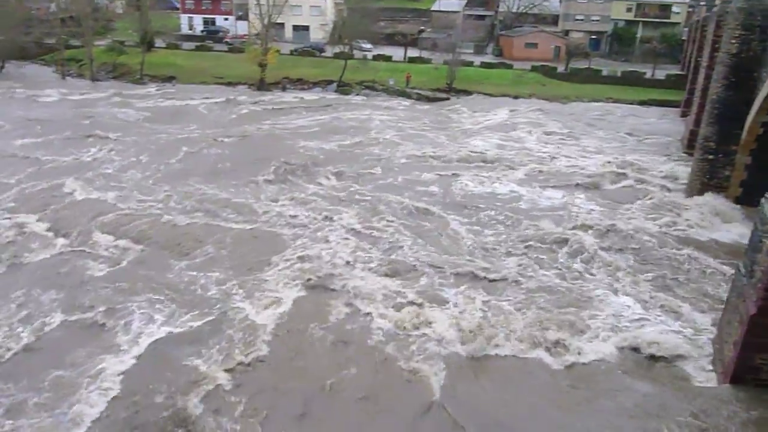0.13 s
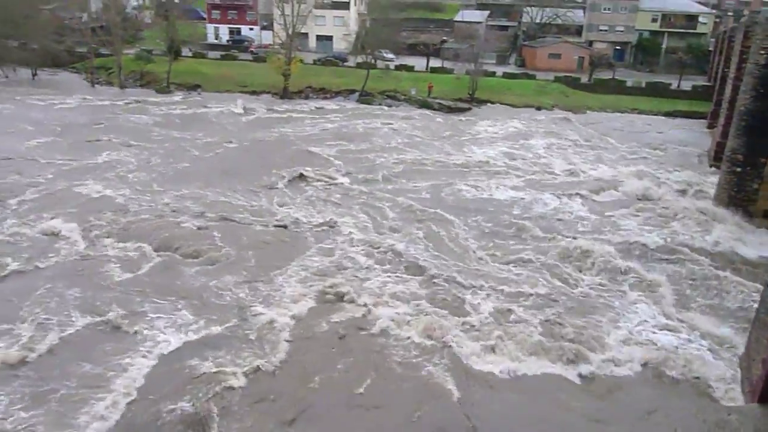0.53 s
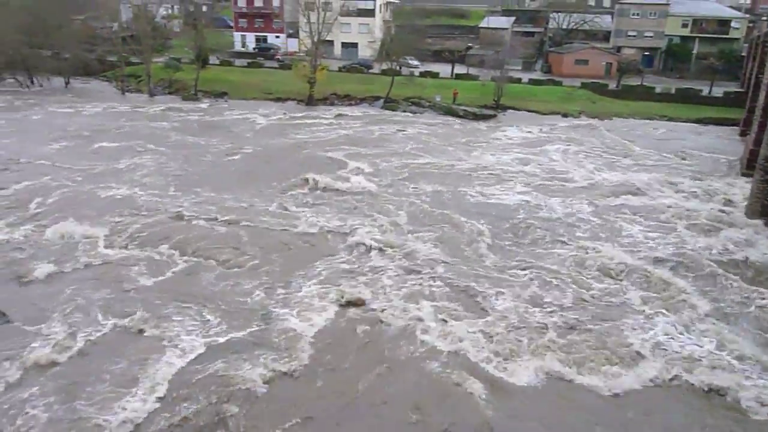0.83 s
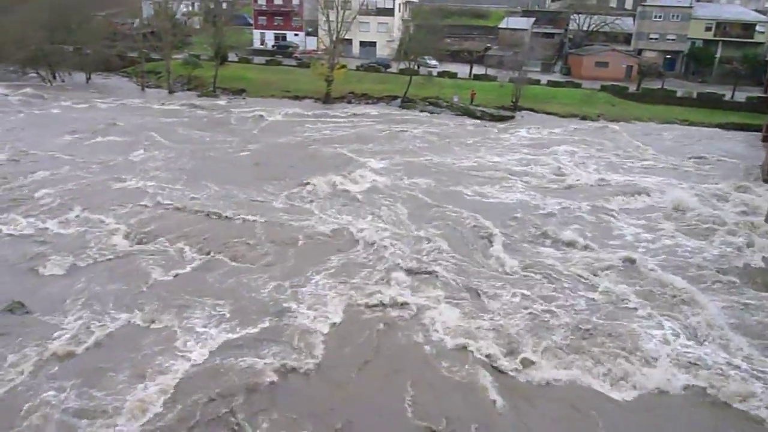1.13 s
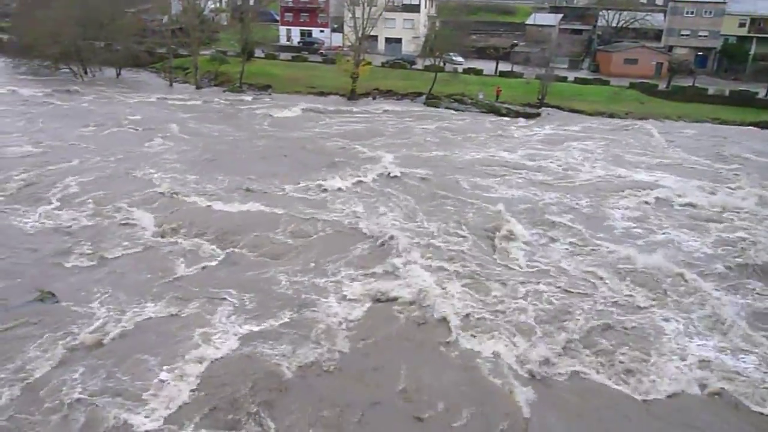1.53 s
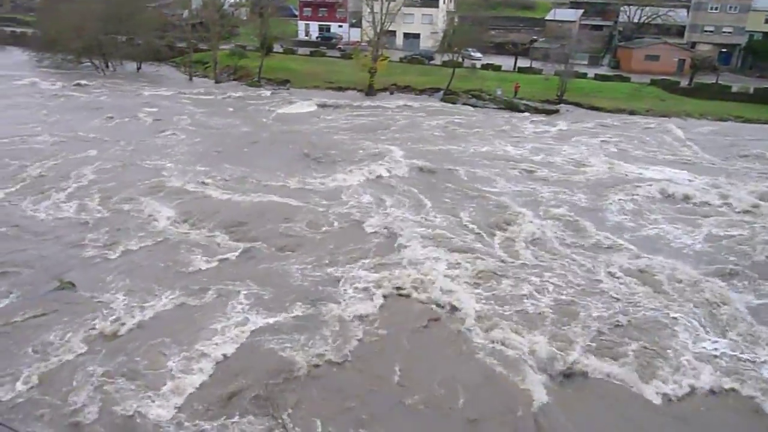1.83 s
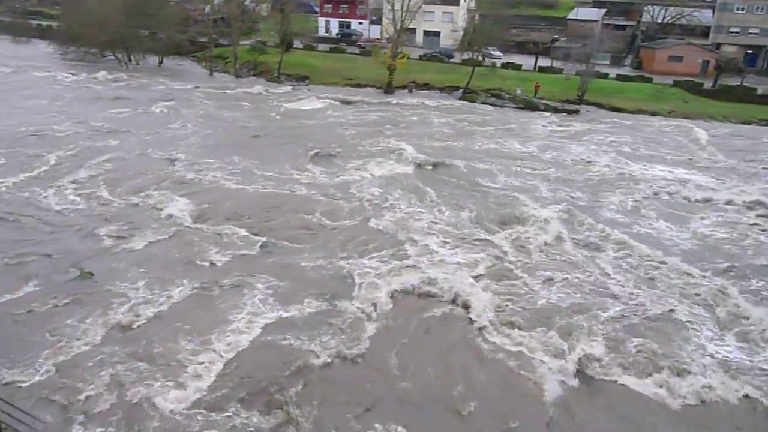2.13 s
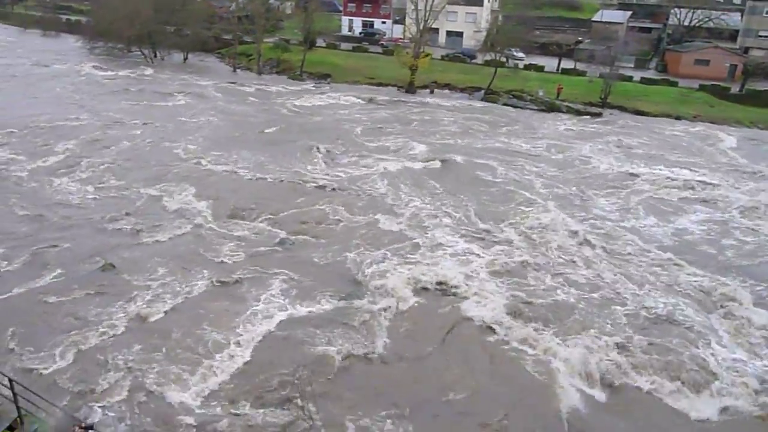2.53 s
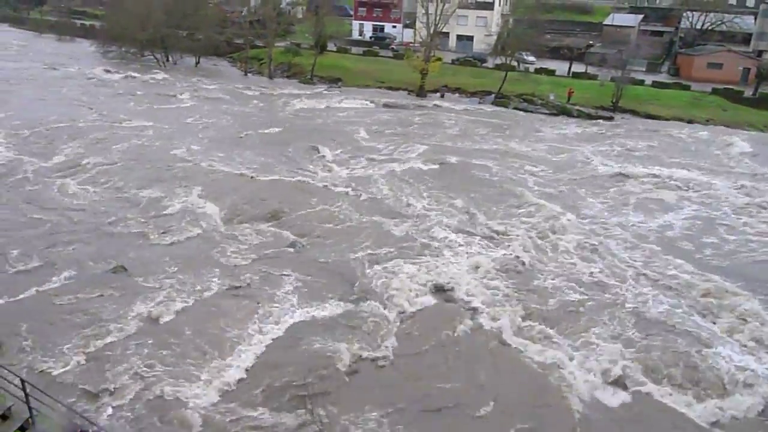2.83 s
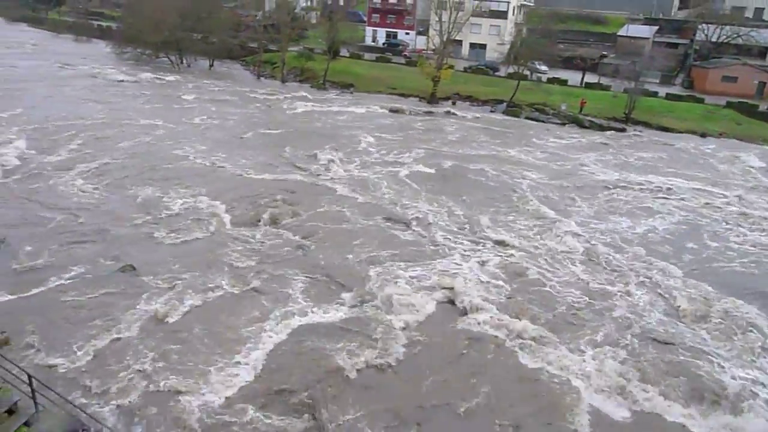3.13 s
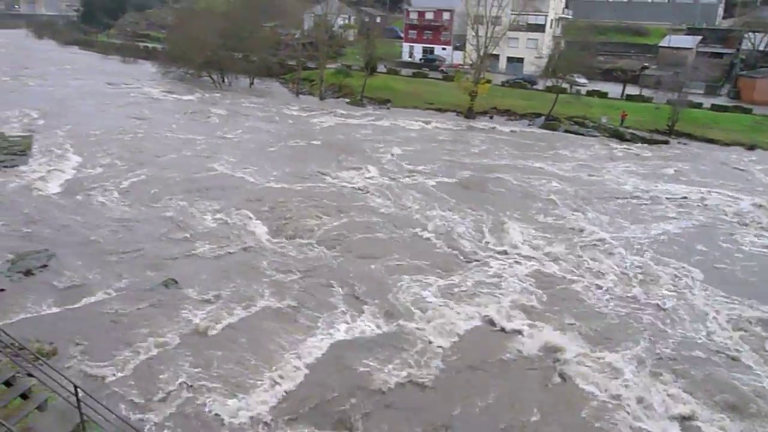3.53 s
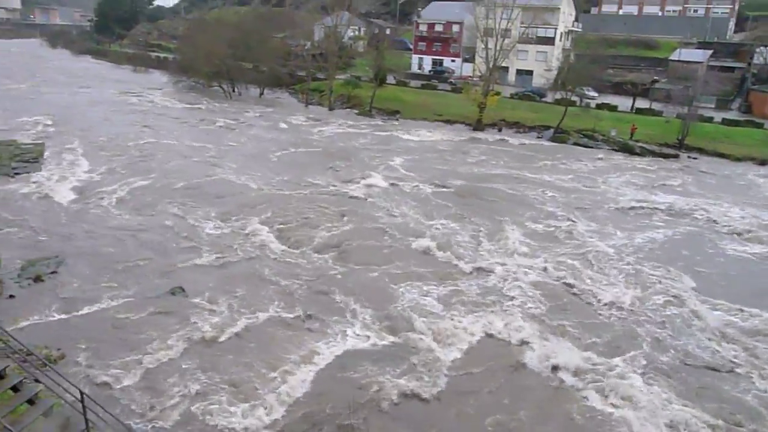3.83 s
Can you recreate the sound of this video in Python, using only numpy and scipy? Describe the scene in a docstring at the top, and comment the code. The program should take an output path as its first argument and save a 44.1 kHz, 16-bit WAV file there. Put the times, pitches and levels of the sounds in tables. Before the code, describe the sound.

Gusts of wind hit the microphone with low rumbles and sharp thumps, scattered at first, then stronger and nearly continuous toward the end. A swollen river below the bridge keeps up a softer, even rush throughout.

```python
"""Wind buffets a small mono microphone: short separate gusts, then a blow that builds to the end.
Eddies on the microphone's port make the roar; the stronger the wind, the finer they get and the
brighter and more ragged it sounds. Hard eddies slap, small ones sputter, large slow ones rumble.
Behind it a river in flood, heard from a bridge above, rushes steadily with countless bubbles."""
import sys
import numpy as np
from scipy.fft import rfft, irfft, next_fast_len
from scipy.io import wavfile
from scipy.ndimage import map_coordinates

SR = 44100
rng = np.random.default_rng(int(sys.argv[2]) if len(sys.argv) > 2 else 0)


def wav_record(signal):
    """Record a signal, one row per channel, as 16-bit PCM in the file named by sys.argv[1]."""
    frames = np.transpose(np.atleast_2d(signal))
    bounded = np.clip(frames, -1, 1)
    # unit amplitude maps onto the largest positive 16-bit level
    quanta = np.round(bounded * 32767).astype(np.int16)
    wavfile.write(sys.argv[1], SR, quanta)


N = 176400

# Tone of the river's rush. Each row: frequency in Hz, relative level in dB.
RIVER_SPECTRUM = [(25, -29.5), (60, -8.5), (140, 0), (320, 1), (450, -4.5), (580, -1.5), (880, -2.5),
                  (1250, -6.5), (2000, -8.5), (3000, -9.5), (4500, -12.5), (6000, -16.5), (7000, -21.5)]
# The river's midrange swells most; bass and hiss stay nearly steady.
# Each row: frequency in Hz, depth in dB.
RIVER_PATCH_DEPTH = [(150, 0), (700, 1), (2000, 0.76), (5000, -0.24)]
# Tone of the largest eddies. Each row: frequency in Hz, relative level in dB.
RUMBLE_SPECTRUM = [(20, -18.5), (40, -22), (80, -3), (115, -3), (160, -3), (240, -21.5), (500, -56.5)]
# The bass swells and lulls on its own, phrase by phrase. Each point: time in seconds, level in dB.
RUMBLE_SWELLS = [
    [(0.0, -44), (0.076, -60), (0.13, -48), (0.378, -61), (0.44, -59), (0.462, -72), (0.508, -74),
     (0.52, -64)],
    [(0.53, -66), (0.564, -41), (0.956, -56), (1.01, -77), (1.064, -44), (1.262, -54), (1.28, -77),
     (1.35, -74)],
    [(1.36, -74), (1.424, -67), (1.65, -43), (1.674, -49.5), (1.908, -46.5), (1.954, -68), (2.012, -52),
     (2.2, -54)],
    [(2.21, -47.5), (2.358, -42.5), (2.702, -49.5), (2.966, -36.5), (3.072, -44.5), (3.65, -33.5),
     (3.67, -40), (4.0, -32.5)],
]
# Single hard eddies. Each row: centre time in seconds, pulse level in dB, tearing level in dB.
SLAP_HITS = [(0.008, -20, -60), (0.11, -17, -27), (0.13, -18, -17), (0.147, -7, -20.5), (0.175, -31, -23.5),
             (0.235, -28, -40), (0.55, -16, -32.5), (0.561, -33, -29), (0.576, -9.5, -44),
             (0.609, -10.5, -24), (0.672, -22, -31), (0.726, -26, -31.5), (1.067, -38, -41),
             (1.642, -29, -29.5), (1.664, -40, -30), (1.904, -20.5, -44), (2.319, -37, -53),
             (2.414, -17, -52), (2.467, -32, -27), (2.552, -17.5, -57), (2.593, -26, -35),
             (2.626, -14, -33.5), (2.684, -15.5, -30.5), (2.712, -9.5, -31), (2.841, -27, -31),
             (2.922, -21, -27.5), (3.019, -14, -47), (3.148, -13, -50), (3.186, -25, -53), (3.24, -14, -33),
             (3.273, -11, -25), (3.432, -8, -27), (3.48, -31, -27), (3.521, -20.5, -20.5),
             (3.584, -6.5, -22), (3.601, -4, -30), (3.649, -14, -25.5), (3.684, -13, -25.5),
             (3.731, -10, -26.5), (3.747, -20, -21.5), (3.761, -5, -22), (3.827, -17, -17),
             (3.842, -14, -25), (3.866, -15, -17), (3.879, -21, -18), (3.921, -9, -17), (3.979, 0, -42)]
# Tone of the fine turbulence around a slap. Each row: frequency in Hz, relative level in dB.
TEAR_SPECTRUM = [(100, -30.5), (450, -3), (900, 5.5), (1600, -1), (2800, -7.5), (4500, -19.5),
                 (7000, -33.5)]
# Tone of the wind's roar. Each row: frequency in Hz, relative level in dB.
ROAR_SPECTRUM = [(20, -25), (45, -10), (90, -7), (160, -0.5), (250, 3.44), (330, 1.5), (400, -0.5),
                 (480, -1.5), (620, -4), (1100, -15), (1550, -17.5), (2000, -21.5), (3000, -27),
                 (5000, -34), (7000, -44)]
# Flutter of the roar; fine eddies are the most fitful. Each row: frequency in Hz, depth in dB.
FLUTTER_DEPTH = [(100, .8), (400, 0.8), (1200, 1), (4000, 5)]
# Wind strength on the microphone, gust by gust. Each point: time in seconds, level in dB.
GUST_LEVELS = [
    [(0.0, -38), (0.01, -31), (0.026, -36.5), (0.04, -34.5), (0.05, -47), (0.068, -32), (0.08, -38.5),
     (0.144, -26), (0.21, -31.5)],
    [(0.22, -37), (0.232, -39), (0.258, -31.5), (0.276, -38), (0.302, -38.5), (0.338, -52), (0.36, -44)],
    [(0.51, -56), (0.522, -63), (0.548, -30), (0.612, -28.5), (0.632, -35.5), (0.658, -41), (0.674, -32),
     (0.744, -36), (0.76, -67), (0.776, -39.5), (0.79, -61)],
    [(0.82, -55), (0.854, -49), (0.862, -67), (0.896, -43), (0.904, -61), (1.052, -58), (1.07, -40),
     (1.178, -52), (1.276, -44.5), (1.292, -75), (1.45, -56)],
    [(1.5, -58), (1.512, -58), (1.536, -67), (1.546, -46), (1.566, -43), (1.588, -60), (1.644, -33),
     (1.678, -34), (1.688, -40), (1.782, -47), (1.8, -64)],
    [(1.82, -50), (1.832, -53), (1.862, -43), (1.868, -46), (1.9, -46), (1.908, -34.5), (1.924, -44),
     (1.934, -64), (2.124, -45), (2.192, -55), (2.2, -45.5)],
    [(2.22, -37), (2.23, -37), (2.252, -53), (2.264, -39.5), (2.332, -33), (2.358, -40.5), (2.408, -35.5),
     (2.416, -31.5), (2.434, -35), (2.47, -28.5), (2.53, -34.5)],
    [(2.54, -50), (2.56, -28), (2.586, -42.5), (2.592, -32), (2.668, -37.5), (2.682, -33.5), (2.704, -32),
     (2.712, -28), (2.748, -39.5), (2.754, -29), (2.81, -36.5)],
    [(2.82, -46), (2.844, -20.5), (2.86, -34.5), (2.886, -30), (2.918, -34), (2.926, -28), (2.984, -32),
     (2.998, -49), (3.028, -31), (3.09, -42.5), (3.11, -38)],
    [(3.12, -47), (3.15, -32.5), (3.158, -45.5), (3.188, -29), (3.228, -41.5), (3.24, -26.5), (3.258, -36),
     (3.314, -22.5), (3.344, -30.5), (3.356, -24), (3.42, -30.5)],
    [(3.43, -23.5), (3.452, -28), (3.604, -20), (3.644, -28.5), (3.656, -18.5), (3.68, -27), (3.7, -27)],
    [(3.71, -24.5), (3.778, -24), (3.786, -22.5), (3.814, -24), (3.822, -19.5), (3.918, -22),
     (3.962, -24.5), (3.98, -18.5), (3.992, -29), (4.0, -18.5)],
]
# Centres of the bands that swell separately, in Hz.
OCTAVES_HZ = 55 * 2. ** np.arange(8)


def amp(db):
    """Decibels to gain."""
    return 10 ** (np.asarray(db) / 20)


def unit(x):
    """Scale to rms 1."""
    return x / np.sqrt(np.mean(x ** 2) + 1e-20)


def along(points, hz):
    """Read (Hz, value) points on a log axis."""
    freqs, values = np.transpose(points)
    return np.interp(np.log(hz + 1), np.log(freqs + 1), values)


def envelope(phrases):
    """Join phrases of (seconds, dB) points into one level curve in dB."""
    times, levels_db = np.concatenate(phrases).T
    return np.interp(np.arange(N) / SR, times, levels_db)


def wobble(rate):
    """A smooth random curve, rate knots a second."""
    return map_coordinates(rng.standard_normal(N // 10), [np.arange(N) * rate / SR], mode="wrap")


def filtered(x, response):
    """Shape x with a frequency response."""
    size = next_fast_len(N + SR // 2)
    return irfft(rfft(x, size) * response(np.fft.rfftfreq(size, 1 / SR)), size)[:N]


def noise(spectrum):
    """Coloured noise of rms 1."""
    return unit(filtered(rng.standard_normal(N), lambda hz: amp(along(spectrum, hz))))


def octaves(x):
    """Split x into (centre Hz, band) pairs that sum back to x."""
    return [(centre, filtered(x, lambda hz: along(np.c_[OCTAVES_HZ, share], hz)))
            for centre, share in zip(OCTAVES_HZ, np.eye(len(OCTAVES_HZ)))]


def river(level_db=-47, swell_db=0.28, swells_per_s=2.2, patches_per_s=11):
    """Countless distant bubbles merge into a rush; breaking waves lift its octaves a little in turn."""
    rush = np.zeros(N)
    for hz, band in octaves(noise(RIVER_SPECTRUM)):
        rush += band * amp(along(RIVER_PATCH_DEPTH, hz) * wobble(patches_per_s))
    return amp(level_db + swell_db * wobble(swells_per_s)) * unit(rush)


def rumble(trim_db=-0.5, lump_db=1.5, lumps_per_s=25):
    """Large slow eddies push on the microphone in lumps."""
    lumps = unit(amp(lump_db * wobble(lumps_per_s)))
    return amp(envelope(RUMBLE_SWELLS) + trim_db) * lumps * noise(RUMBLE_SPECTRUM)


def slaps(pulse_trim_db=-8.5, tear_trim_db=-4.5):
    """A hard eddy is one swing of pressure; fine turbulence tears off it and dies away."""
    port_ring_hz, half_width_cycles = 390, 0.53
    rise_s, fall_s = 0.0019, 0.007
    t = np.arange(N) / SR
    pulses, tearing = np.zeros(N), np.zeros(N)
    for centre_s, pulse_db, tear_db in SLAP_HITS:
        near = slice(max(0, int((centre_s - .02) * SR)), int((centre_s + .08) * SR))
        age = t[near] - centre_s
        cycles = age * port_ring_hz
        window = np.exp(-(cycles / half_width_cycles) ** 2)
        pulses[near] += amp(pulse_db) * window * np.sin(2 * np.pi * cycles)
        tearing[near] += amp(tear_db) * np.exp(np.minimum(age / rise_s, -age / fall_s))
    return amp(pulse_trim_db) * pulses + amp(tear_trim_db) * tearing * noise(TEAR_SPECTRUM)


def sputter(strikes_per_s=130, spread_db=7.5, low_hz=206, high_hz=1110):
    """Small sharp eddies strike at random; the port answers each with a short band-limited swing."""
    struck = rng.random(N) < strikes_per_s / SR
    size = rng.uniform(-1.1, 1, N)
    strikes = struck * np.sign(size) * amp(spread_db * abs(size))
    port = lambda hz: (1j * hz / (low_hz + 1j * hz)) ** 2 / (1 + 1j * hz / high_hz) ** 2
    return unit(filtered(strikes, port))


def wind(trim_db=-1, sputter_db=-7.5, flutter_per_s=110, burst_db=1, bursts_per_cycle=.25):
    """Turbulence on the port: eddies of every size come in bursts, and fine ones need a strong wind."""
    strength_db = envelope(GUST_LEVELS)
    reference_db, reference_hz, brightening = -17.5, 3680, 0.45  # the top opens as the wind rises
    cutoff_hz = reference_hz * amp(brightening * (strength_db - reference_db))
    flutter = unit(np.tanh(wobble(flutter_per_s)))  # shared by all eddy sizes
    turbulence = noise(ROAR_SPECTRUM) + amp(sputter_db) * sputter()
    roar = np.zeros(N)
    for hz, band in octaves(turbulence):
        own_bursts_db = burst_db * wobble(bursts_per_cycle * hz)
        bursts = unit(amp(along(FLUTTER_DEPTH, hz) * flutter + own_bursts_db))
        roar += band * bursts / np.hypot(1, (hz / cutoff_hz) ** 2)
    return amp(strength_db + trim_db) * roar


def scene():
    """A steady bed of river under the wind's rumble, roar and slaps, in mono."""
    return (river() + rumble() + wind() + slaps())[None]


def record(dry):
    """The recorder cuts the top end steeply at its narrow band limit."""
    top_hz = 7150
    return filtered(dry[0], lambda hz: 1 / np.hypot(1, (hz / top_hz) ** 28))[None]


dry = scene()
out = record(dry)
wav_record(out)
```